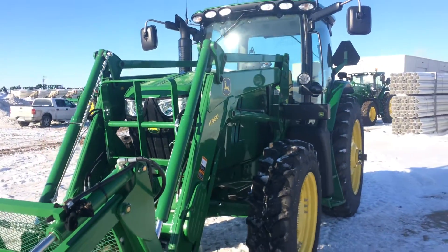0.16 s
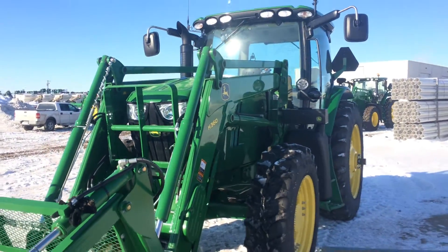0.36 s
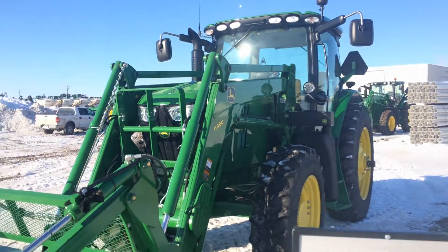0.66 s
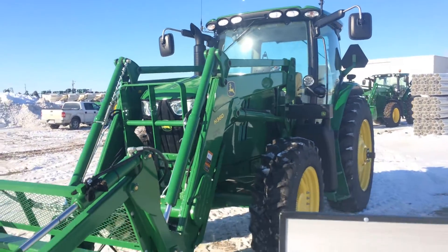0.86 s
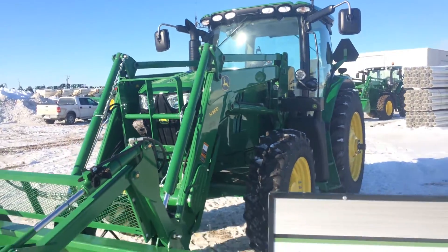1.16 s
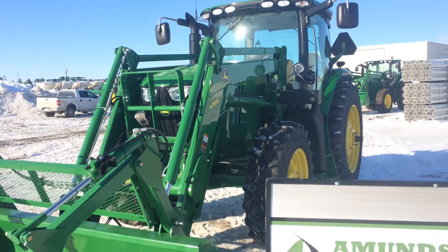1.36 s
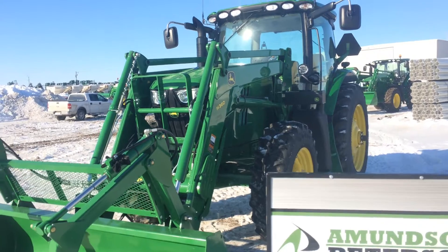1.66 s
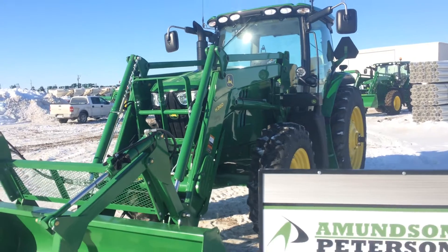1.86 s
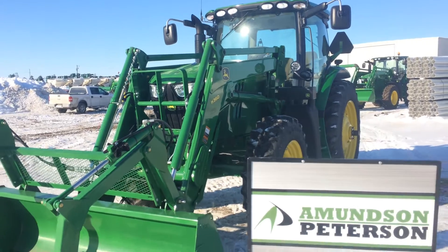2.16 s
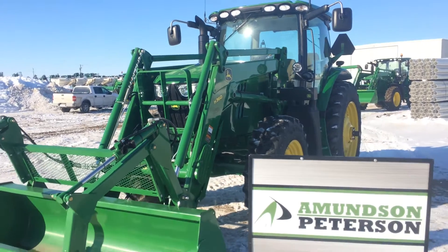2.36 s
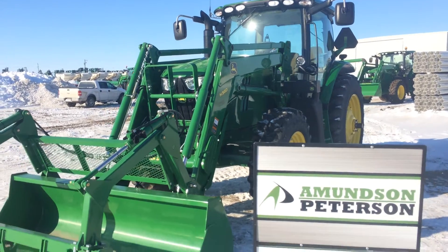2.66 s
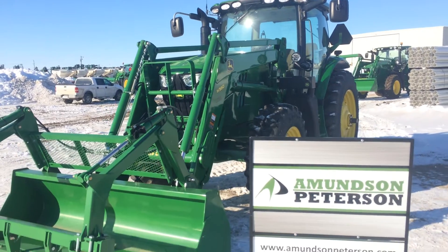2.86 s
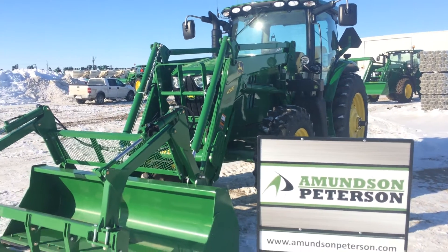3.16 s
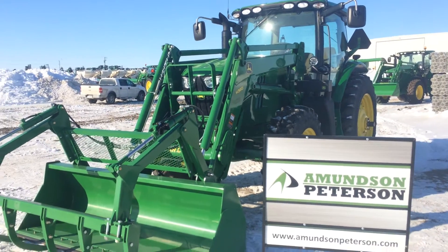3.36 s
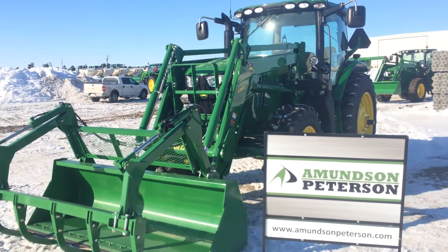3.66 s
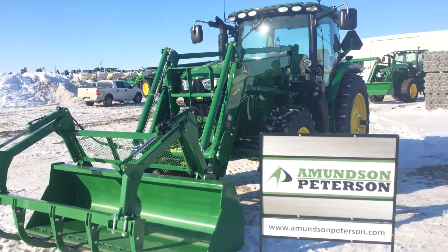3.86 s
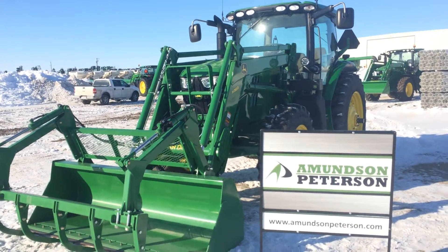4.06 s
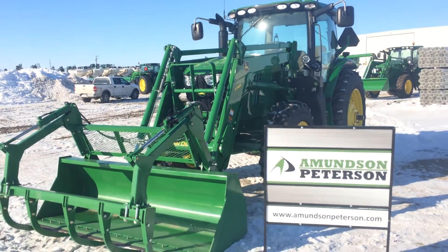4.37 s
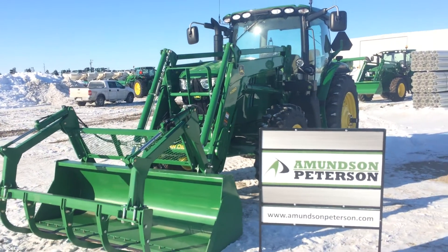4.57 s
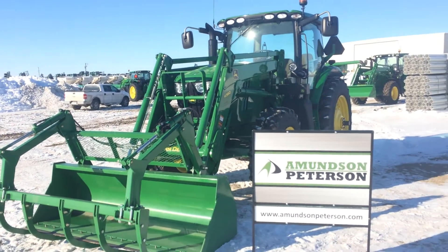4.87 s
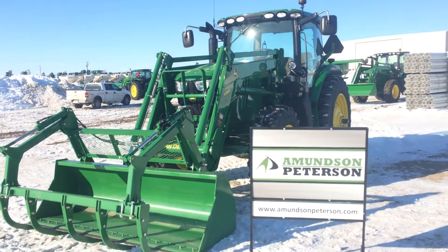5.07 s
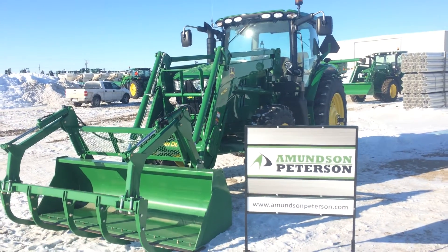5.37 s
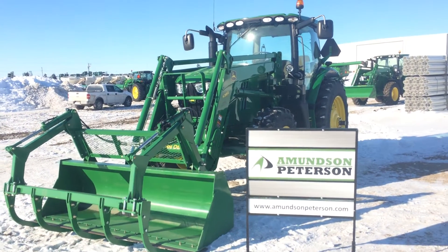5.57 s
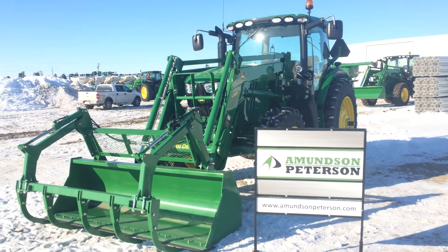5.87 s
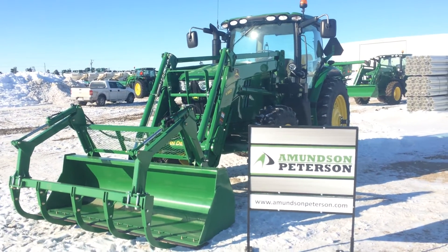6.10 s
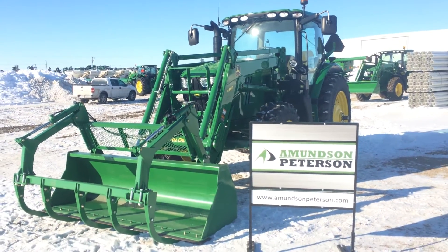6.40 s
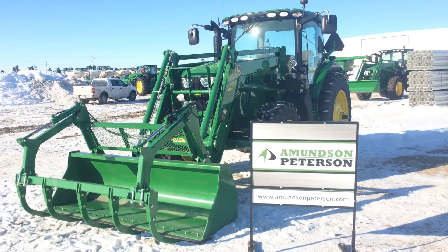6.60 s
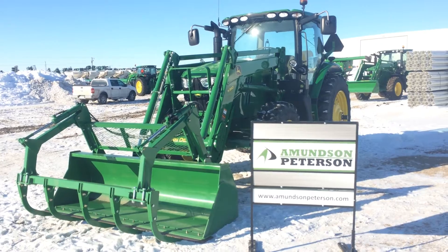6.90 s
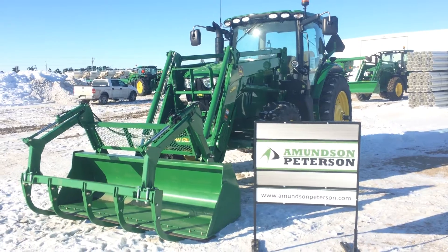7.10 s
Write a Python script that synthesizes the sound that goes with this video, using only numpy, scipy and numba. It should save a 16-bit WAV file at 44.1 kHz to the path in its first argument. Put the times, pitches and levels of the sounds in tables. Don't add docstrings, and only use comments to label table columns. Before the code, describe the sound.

Clattering farm-tractor idle in an open yard, gradually fainter, under low wind buffeting, small handling clicks and two heavy bassy microphone thuds.

```python
import sys
import numpy as np
from scipy import signal
from scipy.fft import rfft, irfft
from scipy.io import wavfile
from scipy.ndimage import uniform_filter1d, minimum_filter1d
from numba import njit

SR = 44100
rng = np.random.default_rng(int(sys.argv[2]) if len(sys.argv) > 2 else 0)


def level_to_linear(level):
    exponent = np.asarray(level, float) / 20
    return 10 ** exponent


def unload_wav(signal):
    wavfile.write(
        sys.argv[1],
        SR,
        np.round(np.clip(np.atleast_2d(signal).T, -1, 1) * 32767).astype(np.int16),
    )


N = 319284
TIME_S = np.arange(N) / SR
CYCLE_HZ, FIRST_KNOCK_S = 7.072, .004
NEAR_M, FAR_M, RETREAT_S = 4.62, 10.4, 4.74

CYLINDER_LEVELS = [0.84, 1.7, 1, 1.9, 0.33, 1]
# (time [s], rate [Hz])
CYCLE_RATE = [
    (0, 7.0715),
    (4.4, 7.0715),
    (5.3, 7.082),
    (7.24, 7.082),
]
# (frequency [Hz], level [dB per Hz])
CLATTER_COLOUR = [(90, -20), (160, -21), (300, 10), (500, -9.5), (800, 8.5), (1150, 7.5), (1350, -4.5),
                  (1700, 0), (1850, 0.5), (2300, -10), (3100, -24.5), (3800, -1), (4600, -61), (7000, -31)]
# (frequency [Hz], width [Hz], lift [dB])
PANEL_RINGS = [(407, 30, 3), (675, 22, -5), (1077, 40, -7.5), (1074, 170, 5.5), (1416, 200, 13),
               (1661, 29, 14.5), (1730, 16, 1), (2503, 300, 17), (3120, 38, 8)]
# (frequency [Hz], level [dB per Hz])
HISS_COLOUR = [(70, -26.5), (125, -9.5), (250, -1.5), (340, -10.5), (420, -4), (800, -4), (1700, -9),
               (1950, -12.5), (3300, -9), (4100, -23.5), (4900, -29), (5600, -28), (8500, -41.5),
               (11000, -48), (15400, -52.5)]
# (multiple of the cycle rate [1], level [dB])
GEAR_TONES = [(24, -14), (60, -16.5), (93, -18), (99, -18), (104, -19), (153, -15.5), (243, -17),
              (581, -32)]
# (frequency [Hz], level [dB])
PUMP_TONES = [(526, -20.5), (3176, -30), (5507, -47), (7865, -57)]
# (frequency [Hz], level [dB], time to fall 60 dB [s])
BLOCK_RINGS = [(830, -11, .025), (1000, -6, .025), (1130, 1, .025), (1215, 4, .035), (1300, 0, .022),
               (1370, -3, .022), (1440, 1, .035), (1530, -2, .022), (1635, -3, .03), (1740, -7, .03),
               (2540, -9, .03), (3100, -12, .02)]
# (share of the cycle [0-1], level [dB], centre [Hz], width [Hz])
LIGHT_STRIKES = [(.22, -18.5, 1664, 290), (.385, -23, 1740, 360), (.53, -28, 2480, 410),
                 (0.97, -26, 2350, 340), (0.022, -27.5, 2500, 190), (.555, -19.5, 1040, 250),
                 (.67, -21, 1107, 210), (0.327, -33.5, 925, 250), (0.96, -18.5, 900, 190),
                 (.5, -31.5, 1630, 330), (.88, -25, 1500, 300), (.58, -33, 4140, 450),
                 (.65, -33.5, 4300, 500), (.1, -35.5, 4250, 250), (0.61, -28, 3100, 240),
                 (0.044, -34, 4420, 860), (0.26, -30, 4150, 630)]
# (frequency [Hz], level [dB])
DRONE_TONES = [(175, -43), (270, -41)]
# (frequency [Hz], level [dB per Hz])
RUMBLE_COLOUR = [(22, -30), (40, -6.5), (65, -1), (110, 3), (180, -6.5), (300, -17.5), (600, -25.5)]
# (start [s], length [s], level [dB], share of higher flutter [0-1])
GUST_EVENTS = [(0, 0.34, -39.5, 1), (0.418, 0.14, -39, 0.2), (0.553, 0.2, -56, 0.6),
               (0.746, 0.08, -33.5, 0.27), (0.872, 0.36, -33, 0.07), (1.274, 0.2, -41.5, 0.3),
               (1.736, 0.36, -41.5, 0.1), (2.08, 0.2, -39, 0), (2.352, 0.22, -48, 0.1),
               (2.58, 0.097, -34, 0.13), (2.764, 0.37, -36.5, 0.06), (3.207, 0.26, -39.5, 0.3),
               (3.486, 0.098, -33.5, 0.3), (3.679, 0.027, -34, 0), (3.738, 0.067, -45, 0.1),
               (3.816, 0.076, -25, 0.14), (3.885, .035, -30, .1), (3.964, 0.04, -31, 0),
               (4.024, 0.38, -38, 0.02), (4.424, 0.18, -31.5, 0.54), (4.613, 0.15, -33, 0.14),
               (4.78, 0.13, -33.5, 0.25), (4.938, 0.23, -31, 0.01), (5.253, 0.1, -38.5, 0.06),
               (5.343, 0.047, -31, 0.13), (5.445, 0.019, -52, 0.2), (5.632, 0.077, -39, 0.04),
               (5.73, 0.14, -36.5, 0.54), (5.909, 0.3, -33, 0.19), (6.25, 0.032, -38, 0),
               (6.335, 0.047, -31.5, 0.26), (6.39, 0.18, -35, 0.04), (6.55, .06, -31, 0.01),
               (6.616, .05, -37.5, 0.2), (6.813, 0.091, -35.5, 0.4), (6.895, 0.16, -34, 0),
               (7.147, 0.1, -46, 0.3)]
# (time [s], peak level [dB], frequency [Hz])
EDDY_EVENTS = [(0.004, -24, 286), (0.037, -24.5, 192), (0.176, -25, 236), (0.187, -29, 156),
               (0.258, -26, 205), (0.444, -27, 236), (0.489, -24, 165), (0.781, -33, 134),
               (0.883, -25, 205), (0.9, -27, 156), (0.942, -22, 117), (1.014, -25, 82), (1.065, -28, 96),
               (1.113, -26, 97), (1.164, -29, 103), (1.181, -25, 119), (1.726, -23, 165),
               (2.12, -26.5, 143), (2.799, -29, 177), (2.823, -26, 145), (2.852, -24.5, 145),
               (3.114, -24, 169), (3.279, -24, 150), (3.504, -28, 135), (3.516, -24, 220), (3.537, -27, 96),
               (3.56, -28, 179), (3.59, -27.5, 135), (3.707, -26, 311), (3.717, -29, 109), (4.445, -29, 89),
               (4.468, -29.5, 89), (4.487, -28, 271), (4.518, -28, 204), (4.533, -20, 126),
               (4.578, -35, 145), (4.8, -32, 118), (4.828, -44, 135), (4.84, -16.5, 186), (4.857, -21, 155),
               (4.872, -24, 126), (4.905, -30, 55), (4.97, -14, 124), (4.989, -20, 88.5), (5.019, -26, 127),
               (5.15, -20, 103), (5.263, -27.5, 118), (5.377, -34, 110), (5.662, -23, 131),
               (5.763, -21, 103), (5.809, -22.5, 146), (5.966, -22, 126), (6.059, -26, 96),
               (6.094, -24, 89), (6.115, -22, 314), (6.172, -21, 91.5), (6.192, -31, 157),
               (6.947, -22, 190), (6.991, -28, 78), (7.02, -23.5, 115)]
# (time [s], peak level [dB], centre [Hz])
TICK_EVENTS = [(.628, -44, 5200), (.6311, -41, 5000), (.6311, -45, 5700), (.6311, -56, 7200),
               (1.85, -50, 5800), (3.8398, -27, 1400), (4.9565, -30, 850), (6.1035, -23, 410),
               (6.1035, -25, 620), (6.1035, -29, 820), (6.8835, -26, 1100), (6.8835, -35, 3000),
               (6.8835, -47, 5600), (6.8835, -56, 7600)]
# (time [s], level [dB], top frequency [Hz])
RASP_EVENTS = [(.921, -32, 490), (1.111, -33.5, 425), (3.531, -40.5, 337), (3.706, -34.5, 450),
               (3.843, -40, 610), (4.471, -34.5, 490), (4.527, -30, 380), (4.59, -40, 550),
               (4.846, -32, 537), (4.881, -38, 460), (5.981, -33, 417), (6.112, -32, 420),
               (6.175, -30.5, 456), (6.951, -41, 285)]
# (start [s], peak level [dB], frequency [Hz], minus for a pull, length [s],
# lateness of the swell [1], overtone share [1])
THUMP_EVENTS = [
    (3.829, -23, -50, .011, 1, 0),
    (3.8295, -.2, -66, .03, 1.45, .18),
    (3.8522, .6, 64, .031, .8, -.04),
    (4.9183, -5.3, 78, .018, 1.1, .02),
    (4.9365, -4, 57, .024, .6, .03),
]


def curve(rows):
    return np.interp(TIME_S, *np.transpose(rows))


def unit(x):
    return x / np.sqrt(np.mean(x ** 2))


def band_pass(x, low_hz, high_hz, order=2):
    band = signal.butter(order, [low_hz, high_hz], "band", fs=SR, output="sos")
    return unit(signal.sosfilt(band, x))


def colour(x, points, peaks=()):
    hz = np.maximum(np.arange(N // 2 + 1) * SR / N, 1)
    point_hz, point_db = np.transpose(points)
    db = np.interp(np.log(hz), np.log(point_hz), point_db, right=-120)
    for centre, width, lift_db in peaks:
        db = db + lift_db / (1 + (2 * (hz - centre) / width) ** 2)
    return unit(irfft(rfft(x) * level_to_linear(db), N))


def walk(rate):
    hold = int(SR / rate)
    steps = np.repeat(rng.standard_normal(N // hold + 1), hold)
    return unit(uniform_filter1d(uniform_filter1d(steps, hold), hold)[:N])


def flicker(x, edges_hz, depth_db, rate):
    spectrum, hz = rfft(x), np.arange(N // 2 + 1) * SR / N
    out = np.zeros(N)
    for low, high in zip(edges_hz, edges_hz[1:]):
        band = irfft(spectrum * ((hz >= low) & (hz < high)), N)
        out += band * level_to_linear(depth_db * walk(rate))
    return unit(out)


def wavering_tone(angle, db, db_spread, level_rate, angle_spread, angle_rate):
    level = level_to_linear(db + db_spread * walk(level_rate))
    return level * np.sin(angle + angle_spread * walk(angle_rate))


def crank():
    rate = curve(CYCLE_RATE) * (1 + 0.0003696 * walk(0.774))
    return 1 + np.cumsum(rate) / SR - FIRST_KNOCK_S * CYCLE_HZ


def knocks(turn, rise, decay, scatter_db):
    firing = np.floor(6 * turn).astype(int)
    since = 6 * turn - firing
    scatter = scatter_db * rng.standard_normal(400)[firing % 400]
    strength = level_to_linear(np.array(CYLINDER_LEVELS)[firing % 6] + scatter)
    return unit(strength * (1 - np.exp(-since / rise)) * np.exp(-since / decay))


def clatter(turn):
    size = int(SR / CYCLE_HZ)
    place = (turn % 1 * size).astype(int)
    first, second = rng.standard_normal((2, size))[:, place]
    drift = 0.5 * walk(1.655)
    pattern = np.cos(drift) * first + np.sin(drift) * second
    knocked = pattern * unit(1.15 + knocks(turn, .1, .45, 1))
    low = signal.butter(2, 750, fs=SR, output="sos")
    steadied = knocked + signal.sosfiltfilt(low, pattern - knocked)
    return colour(steadied, CLATTER_COLOUR, PANEL_RINGS)


def hiss(turn):
    air = rng.standard_normal(N) * (4.4 + knocks(turn, .12, .35, 3))
    edges_hz = (0, 300, 600, 1200, 2400, 3400, 4700, 7000, 10000, SR / 2)
    return flicker(colour(air, HISS_COLOUR, PANEL_RINGS[:3]), edges_hz, 0.52, 5.8)


def valves(turn):
    centre_hz, width_hz = 3888, 1170
    beat_db = 2.2 * np.cos(4 * np.pi * (turn - .09)) - .4 * np.cos(2 * np.pi * (turn - .15))
    uneven_db = 2.0 * walk(7) + 1.5 * walk(60)
    chatter = level_to_linear(beat_db + uneven_db) * (2.2 + knocks(turn - .02, .2, .5, 2.5))
    noise = rng.standard_normal(N) * chatter
    return band_pass(noise, centre_hz - width_hz / 2, centre_hz + width_hz / 2, order=6)


def rap(turn):
    rebound_s, jitter_s, rebound_db = .0049, .0003, -2
    at = np.flatnonzero(np.diff(np.floor(turn + 0.014)))
    count = len(at)
    blows, uneven_db = np.zeros(N + SR), 2.2 * rng.standard_normal(60)
    blows[at] = level_to_linear(uneven_db[:count])
    delay_s = rebound_s + jitter_s * np.tanh(uneven_db[-count:])
    blows[at + (delay_s * SR).astype(int)] = level_to_linear(rebound_db + uneven_db[::-1][:count])
    d = np.arange(SR // 8) / SR
    starts = np.resize(rng.uniform(size=11), len(BLOCK_RINGS))
    ring = np.zeros(len(d))
    for (hz, db, t60), start in zip(BLOCK_RINGS, starts):
        ring += level_to_linear(db) * np.exp(-np.log(1000) * d / t60) * np.sin(2 * np.pi * (hz * d + start))
    soft_start = 1 - np.exp(-d / .002)
    return unit(signal.fftconvolve(blows, ring * soft_start)[:N])


def strikes(turn):
    strike_s, scatter_db = .006, 2.5
    noise, out = rng.standard_normal(N), np.zeros(N)
    for k, (share, db, hz, width) in enumerate(LIGHT_STRIKES):
        since = (turn - share) % 1 / CYCLE_HZ / strike_s
        cycle = np.floor(turn - share).astype(int)
        strength = level_to_linear(scatter_db * noise[cycle + 100 * k])
        burst = np.roll(noise, 9973 * k) * strength * since * np.exp(-2 * since)
        out += level_to_linear(db) * band_pass(burst, hz - width / 2, hz + width / 2)
    return out


def whines(turn):
    gears, pumps = np.zeros(N), np.zeros(N)
    for multiple, db in GEAR_TONES:
        gears += wavering_tone(2 * np.pi * multiple * turn, db, 3.95, 16, 1.35, 30)
    for hz, db in PUMP_TONES:
        slipping_s = TIME_S + np.cumsum(0.000384 * walk(3)) / SR
        pumps += wavering_tone(2 * np.pi * hz * slipping_s, db, 2.37, 18, 0.85, 30)
    sinking_db = 7 - 0.08 * TIME_S ** 2
    return np.sqrt(2) * level_to_linear(sinking_db) * (level_to_linear(-7) * gears + pumps)


def whistle(turn):
    hz, db, fade_at_s = 8183, -49, 1.5
    puff = level_to_linear(db + 9 * np.cos(2 * np.pi * (turn + .03)))
    return puff / (1 + np.exp((TIME_S - fade_at_s) / .15)) * np.sin(2 * np.pi * hz * TIME_S)


def engine():
    turn = crank()
    parts = level_to_linear(-5.5) * clatter(turn) + level_to_linear(-2.0) * hiss(turn) + level_to_linear(-17) * valves(turn)
    parts += level_to_linear(-9.5) * rap(turn) + strikes(turn) + whines(turn) + whistle(turn)
    metres = FAR_M - (FAR_M - NEAR_M) * np.exp(-TIME_S / RETREAT_S)
    return parts * level_to_linear(-33) * NEAR_M / metres


def drone():
    fade_s = .6
    tones = np.zeros(N)
    for hz, db in DRONE_TONES:
        tones += wavering_tone(2 * np.pi * hz * TIME_S, db, 2.5, 10, 1.1, 18)
    return np.sqrt(2) * tones * np.exp(-TIME_S / fade_s)


def gusts():
    lull_db, trim_db, edge_s = -48, -3, .03
    flutter_db, flutter_rate = 2.8, 30
    deep, high = np.full(N, level_to_linear(lull_db) ** 2), np.zeros(N)
    for t, length, db, share in GUST_EVENTS:
        inside = np.minimum(TIME_S - t, t + length - TIME_S) / edge_s
        power = (level_to_linear(db + trim_db) * np.clip(inside + .5, 0, 1)) ** 2
        deep += (1 - share) * power
        high += share * power
    noise = rng.standard_normal((2, N))
    rumble = np.sqrt(deep) * colour(noise[0], RUMBLE_COLOUR)
    flutter = np.sqrt(high) * band_pass(noise[1], 130, 295)
    return sum(layer * level_to_linear(flutter_db * walk(flutter_rate)) for layer in (rumble, flutter))


def around(t):
    return slice(max(int((t - .1) * SR), 0), int((t + .1) * SR))


def eddies():
    turns, sag_per_s = 0.77, 2.5
    out = np.zeros(N)
    for t, db, hz in EDDY_EVENTS:
        near = around(t)
        d = TIME_S[near] - t
        swell = level_to_linear(db) * np.exp(-(d * hz / turns) ** 2)
        phase = rng.uniform(0, 2 * np.pi)
        out[near] += swell * np.cos(2 * np.pi * hz * (d - sag_per_s * d ** 2) + phase)
    return out


def ticks():
    tick_s = .0025
    out, d = np.zeros(N), np.arange(SR // 40) / SR
    for t, db, hz in TICK_EVENTS:
        swell = (1 - np.exp(-d / .0006)) ** 2 * np.exp(-d / tick_s * (hz / 1000) ** .7)
        ping = np.sin(2 * np.pi * hz * d) * swell
        out[int(t * SR):][:len(d)] += level_to_linear(db) * ping / np.abs(ping).max()
    return out


def rasps():
    rise_s, tail_s = .011, .015
    out, noise = np.zeros(N), rng.standard_normal(N)
    for t, db, top_hz in RASP_EVENTS:
        near = around(t)
        d = TIME_S[near] - t
        swell = np.exp(-(d / np.where(d < 0, rise_s, tail_s)) ** 2)
        out[near] += level_to_linear(db) * swell * band_pass(noise[near], .45 * top_hz, 1.09 * top_hz)
    return out


def thumps():
    out = np.zeros(N)
    for t, db, hz, length, late, bend in THUMP_EVENTS:
        x = np.clip((TIME_S - t) / length, 0, 1)
        angle = 2 * np.pi * hz * length * x
        overtones = np.cos(2 * angle) * (x - 1) - 0.67 * np.sin(3 * angle)
        swell = np.sin(np.pi * x ** late) ** 1.2
        out += level_to_linear(db) * swell * (np.sin(angle) + bend * overtones)
    return out


def scene():
    wind = gusts() + eddies() + rasps() + thumps()
    return (engine() + drone() + wind + ticks())[None]


@njit
def slew(target, fall, rise):
    out, g = np.empty(len(target)), 1.
    for i in range(len(target)):
        g += (target[i] - g) * (fall if target[i] < g else rise)
        out[i] = g
    return out


def roll_off(x):
    return signal.sosfilt(signal.butter(12, 15290, fs=SR, output="sos"), x)


def record(dry):
    limit_db, limit_slope = -8.5, 0.88
    attack_s, hold_s, release_s = .005, .278, .022
    size = int(hold_s * SR) // 2 * 2 + 1
    need = np.minimum(1, level_to_linear(limit_db) / (np.abs(dry[0]) + 1e-9)) ** limit_slope
    held = minimum_filter1d(need, size, origin=size // 2)
    gain = slew(held, 1 / (attack_s * SR), 1 / (release_s * SR))
    return roll_off(dry * gain)


dry = scene()
out = record(dry)
unload_wav(out)
```